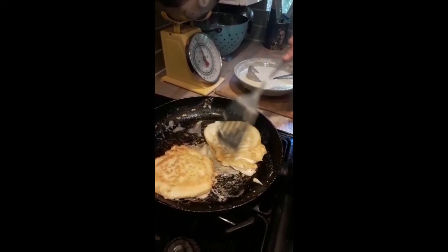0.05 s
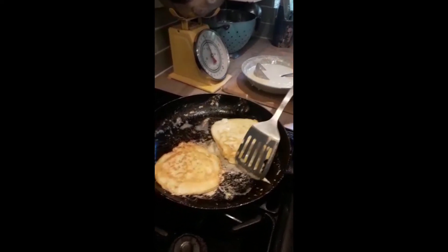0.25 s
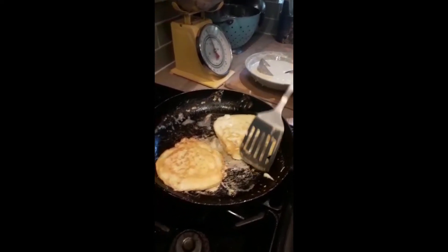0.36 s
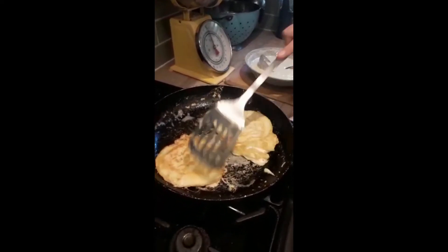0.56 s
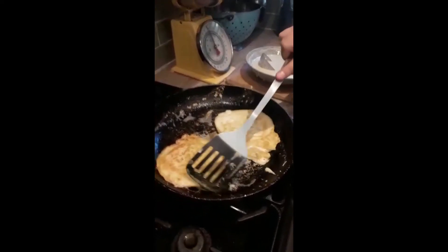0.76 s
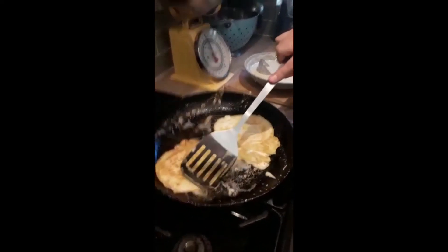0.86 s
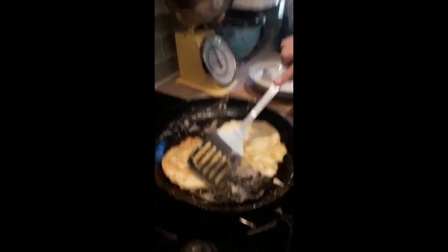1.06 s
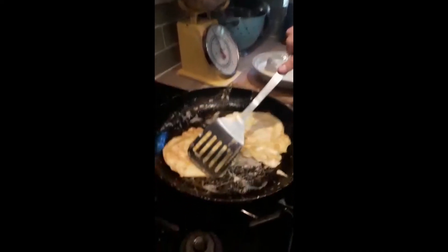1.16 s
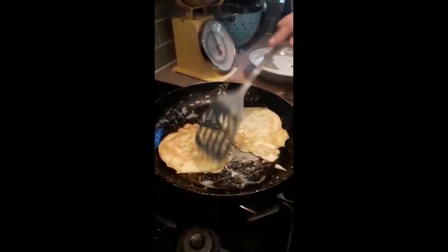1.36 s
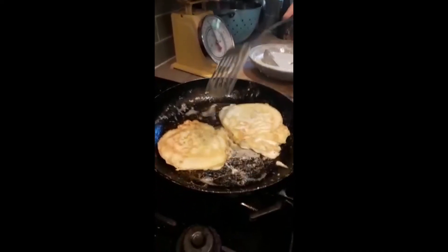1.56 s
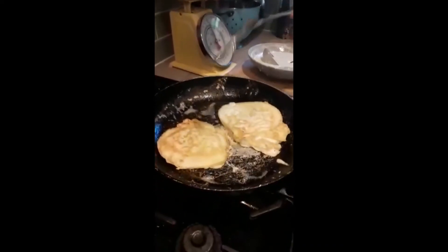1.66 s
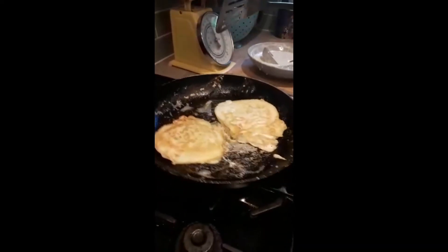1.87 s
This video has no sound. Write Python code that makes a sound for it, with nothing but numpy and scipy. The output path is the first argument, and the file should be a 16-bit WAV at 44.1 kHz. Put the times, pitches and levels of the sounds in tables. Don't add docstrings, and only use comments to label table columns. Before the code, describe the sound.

A steel spatula strikes a frying pan: a bright, rapid chatter on the rim at 0.22-0.27 seconds, then a loud, choked slap at 0.71 with bounces until 0.83 and a faint touch near 0.97. Quiet sizzling and low flame flutter run beneath. Fat spits and light ticks gather from 1.4, with a faint dish scrape after 1.79. Close, short kitchen reverberation.

```python
import sys
import numpy as np
from scipy import signal
from scipy.fft import rfft, irfft
from scipy.io import wavfile
from scipy.ndimage import uniform_filter1d

SR = 44100
rng = np.random.default_rng(int(sys.argv[2]) if len(sys.argv) > 2 else 0)


def store_pcm(level_fs):
    pcm = np.round(np.clip(level_fs, -1, 1) * 32767).astype(np.int16)
    wavfile.write(sys.argv[1], SR, np.atleast_2d(pcm).T)


def gain_from_decibels(decibels):
    exponent = np.asarray(decibels, float) / 20
    return 10 ** exponent


N = 83790

# t/s, level/dB
FLAME_LEVEL = [(0.0, -57), (0.274, -55), (0.47, -63.5), (0.74, -65), (0.878, -55), (.97, -62), (1.06, -61),
               (1.184, -63.5), (1.376, -65), (1.5, -60.5), (1.6, -61), (1.68, -59.5), (1.76, -60),
               (1.9, -55.5)]
# f/Hz, density/dB per Hz
FLAME_SPECTRUM = [(15, -57.5), (25, -32), (124, -3), (204, -6), (356, -4.5), (462, -14.5), (499, -11),
                  (1000, -10), (1300, -37), (2200, -120)]
# t/s, level/dB, fizz over sizzle/dB
FRY_LEVEL = [(0.0, -50.5, 6.5), (0.296, -48.5, 4), (0.438, -53.5, 5.5), (0.56, -56, 4), (0.942, -55, 5),
             (1.152, -57.5, 7), (1.444, -57, 4), (1.608, -52.5, 3.5), (1.9, -52.5, 6)]
# f/Hz, density/dB per Hz
SIZZLE_SPECTRUM = [(530, -90), (900, -16.5), (1230, -12), (1750, -7.5), (2320, -3), (3140, -10),
                   (3230, -9.5), (5000, -14), (6500, -36), (11000, -120)]
# f/Hz, density/dB per Hz
FIZZ_SPECTRUM = [(2940, -39.5), (5000, -22.5), (6030, -0.5), (6480, -3.5), (7310, -5), (8870, -12),
                 (11500, -2.5), (15800, -9)]
# f/Hz, width/Hz, level/dB
PAN_HUM_BANDS = [(2260, 350, -14.5), (5495, 500, -10.5), (12000, 900, -14.5)]
# t/s, level/dB
WHISTLE_LEVEL = [(0, -76), (.5, -91), (1.2, -78), (1.36, -67.5), (1.6, -67), (1.75, -72), (1.82, -63.5),
                 (1.9, -69)]
# t/s, peak level/dB, low cut f/Hz
FAT_SPITS = [(0.338, -33, 9000), (0.371, -41, 9000), (.411, -41, 9000), (0.7757, -43, 9000),
             (0.929, -54, 3000), (1.396, -39, 4930), (1.4491, -40.5, 10000), (1.457, -42, 3530),
             (1.503, -36.5, 10000), (1.5942, -44, 9000), (1.666, -34, 9050), (1.705, -38.5, 9000),
             (1.84, -44, 5000)]
# t/s, peak level/dB, f/Hz
BLADE_TICKS = [(1.3947, -48, 2250), (1.4591, -44, 2230), (1.503, -42, 2194), (1.5145, -36.5, 2310),
               (1.5534, -46, 2190), (1.5752, -50, 2410), (1.6824, -49, 2270), (1.7853, -46, 2230),
               (1.572, -47, 1074), (1.808, -43, 1500), (1.812, -41, 1090), (1.836, -45, 1120),
               (1.861, -41, 240), (1.88, -43, 200)]
# t/s, level/dB
SCRAPE_LEVEL = [(1.74, -94.5), (1.79, -59), (1.805, -46.5), (1.826, -55.5), (1.835, -46.5), (1.86, -46),
                (1.875, -50), (1.9, -48.5)]
# f/Hz, width/Hz, level/dB
DISH_BANDS = [(146.3, 57, -5.5), (296, 91, -11), (750, 300, -6), (1114, 120, -1), (1500, 170, -1.5),
              (1870, 200, -6.5), (2310, 250, 0), (2774, 120, -5.5), (3700, 960, -6), (5500, 1400, -8)]
# t/s, level/dB, free ring before choke/s, tilt/dB per octave, contact rise/s
SLAP_BLOWS = [
    (.7102, -14, 0.0049, 2, 0.00023),
    (0.7137, -12.5, 0.01237, -3.5, 0.0026),
    (.742, -32.5, 0.011, -7, .005),
    (.766, -24.5, 0.0094, -4.5, 0.0053),
    (.777, -22, 0.007, -3.5, 0.0027),
    (.80, -25.5, 0.0134, -0.5, 0.0048),
    (.822, -28, 0.016, 1.5, 0.0041),
    (.972, -42, 0.023, 2, 0.0035),
]
# f/Hz, level/dB, t60/s
PAN_RING = [(111.5, -33, 0.13), (250.4, -25, 0.49), (584, -9, 0.13), (726.7, -3, 0.18), (835, -8, 0.27),
            (1067.5, -4.5, 0.13), (1342, -11.5, .06), (1574, -8.5, 0.09), (1826, -13, 0.038),
            (2030, -14, .04), (2270, -1, 0.089), (2650, -6.5, 0.049)]
# f/Hz, density/dB per Hz
SLAP_SPECTRUM = [(180, -51), (350, -14.5), (674, -8), (1810, -8), (2690, -9), (3810, -31.5), (5390, -32.5),
                 (6360, -35.5), (15500, -57.5)]
# f/Hz, level/dB, t60/s
BLADE_RING = [(3374, -2, 0.058), (4300, -0.5, 0.054), (5370, -2, 0.099), (6800, -16, 0.037),
              (7830, -3.5, 0.036), (9300, -14, .05)]
# f/Hz, density/dB per Hz
BLADE_SPECTRUM = [(3000, -2.5), (5000, -8.5), (8000, -12), (11500, -18.5), (13000, -20.5), (15800, -34.5)]
# t/s, level/dB
RIM_HITS = [
    (0.2245, -12),
    (0.2273, -15.5),
    (.234, -14.5),
    (0.241, -14),
    (0.248, -16.5),
    (.258, -20.5),
    (0.268, -23.5),
]
# f/Hz, level/dB, t60/s
RIM_RING = [(147, -24, 0.09), (579, -14, 0.05), (826, -7.5, 0.044), (975, -7, 0.04), (1118, -6, 0.09),
            (1598, -4.5, .06), (1756, -3.5, .1), (2190, -5.5, 0.073), (2435, -9, 0.037), (2644, 0.5, 0.089),
            (2888, 1.5, .09), (3900, -11, 0.053), (4490, -6, .04), (6280, -4.5, .025)]
# f/Hz, density/dB per Hz
RIM_SPECTRUM = [(280, -13.5), (1300, -12), (2950, -1.5), (3300, -15.5), (7300, -16.5), (8000, -29.5),
                (10500, -21.5), (15500, -41.5)]
# f/Hz, t60/s
KITCHEN_T60 = [(125, 0.64), (500, 0.21), (1500, 0.36), (3000, 0.22), (6000, 0.32), (12000, 0.12)]


def gain_of(table, col=1):
    a = np.array(table, float)
    return gain_from_decibels(np.interp(np.arange(N) / SR, a[:, 0], a[:, col]))


def unit(x):
    return x / np.sqrt(np.mean(x ** 2))


def decay(t, t60_s):
    return np.exp(-np.log(1000) * t / t60_s)


def colour(x, points):
    a = np.array(points, float)
    hz = np.fft.rfftfreq(len(x), 1 / SR) + 1
    gain = gain_from_decibels(np.interp(np.log(hz), np.log(a[:, 0]), a[:, 1]))
    low_edge = np.minimum(1, hz / a[0, 0]) ** 4
    high_edge = np.minimum(1, a[-1, 0] / hz) ** 4
    return irfft(rfft(x) * gain * low_edge * high_edge, len(x))


def band(x, hz, width_hz):
    return signal.lfilter(*signal.iirpeak(min(hz, 0.45 * SR), hz / width_hz, fs=SR), x)


def walk(rate_hz):
    k = int(SR / rate_hz)
    steps = np.repeat(rng.standard_normal(N // k + 1), k)
    return unit(uniform_filter1d(uniform_filter1d(steps, k), k)[:N])


def clicks(rate_hz, scatter_db):
    u = rng.random((3, N))
    size = gain_from_decibels(-scatter_db * np.log(u[2] + 1e-4))
    return unit((u[0] < rate_hz / SR) * np.sign(u[1] - 0.5) * size)


def add(out, at_s, x):
    i = int(at_s * SR)
    out[i:i + len(x)] += x[:N - i]


def blow(modes, crack, crack_db, crack_s, rise_s, split, tilt_db=0):
    t = np.arange(SR // 2) / SR
    tilt_hz = 1420
    hz, db, t60_s = np.repeat(np.array(modes, float), 3, axis=0).T
    c = rng.standard_normal((len(hz), 3))
    spread = c[:, 2] - c[:, 2].reshape(-1, 3).mean(axis=1).repeat(3)
    signs = np.sign(c[::3, 1]).repeat(3)
    gains = signs * gain_from_decibels(db + tilt_db * np.log2(hz / tilt_hz) + 2 * c[:, 0])
    partner_hz = hz * (1 + split * spread)
    ring = gains @ (np.sin(2 * np.pi * partner_hz[:, None] * t) * decay(t, t60_s[:, None]))
    tilted = [(f, d + tilt_db * np.log2(f / tilt_hz)) for f, d in crack]
    noise = unit(colour(rng.standard_normal(len(t)), tilted))
    rise = 1 - np.exp(-(t / rise_s) ** 2)
    return (ring / 3 + gain_from_decibels(crack_db) * noise * np.exp(-t / crack_s)) * rise


def room(x):
    t = np.arange(int(0.7 * SR)) / SR
    a = np.array(KITCHEN_T60)
    tail = 0
    for hz in 90 * 2 ** np.arange(0, 7.6, 0.5):
        t60_s = np.interp(np.log(hz), np.log(a[:, 0]), a[:, 1])
        tail = tail + band(rng.standard_normal(len(t)), hz, hz / 2.5) * decay(t, t60_s)
    rise_s = 0.01
    tail = tail * (1 - np.exp(-t / rise_s))
    return signal.fftconvolve(x, tail / np.sqrt(np.sum(tail ** 2)))[:N]


def flame():
    rumble = unit(colour(rng.standard_normal(N), FLAME_SPECTRUM))
    return gain_of(FLAME_LEVEL) * rumble * gain_from_decibels(1.1 * walk(12))


def bubbling():
    bubbles_per_s, scatter_db, bubble_db = 720, 2, -7.5
    return rng.standard_normal(N) + gain_from_decibels(bubble_db) * clicks(bubbles_per_s, scatter_db)


def frying():
    sizzle = unit(colour(bubbling(), SIZZLE_SPECTRUM)) * gain_from_decibels(walk(25.4))
    fizz = unit(colour(bubbling(), FIZZ_SPECTRUM)) * gain_from_decibels(-9.5 + 0.73 * walk(15))
    hum = 0
    for hz, width_hz, db in PAN_HUM_BANDS:
        tone = unit(band(band(bubbling(), hz, width_hz), hz, width_hz))
        hum = hum + gain_from_decibels(db + 2 * walk(31)) * tone
    return gain_of(FRY_LEVEL) * (sizzle + hum + gain_of(FRY_LEVEL, col=2) * fizz)


def whistle():
    hz, width_hz = 12650, 220
    steam = band(band(rng.standard_normal(N), hz, width_hz), hz, width_hz)
    return gain_of(WHISTLE_LEVEL) * unit(steam) * gain_from_decibels(2.5 * walk(25))


def spits():
    out, t = np.zeros(N), np.arange(SR // 10) / SR
    peak_s, trim_db = 0.00285, -7
    for s, db, low_cut_hz in FAT_SPITS:
        high_pass = signal.butter(2, low_cut_hz, "high", fs=SR)
        puff = signal.lfilter(*high_pass, rng.standard_normal(len(t)))
        add(out, s, gain_from_decibels(db + trim_db) * puff * t / peak_s * np.exp(1 - t / peak_s))
    return out


def ticks():
    out, t = np.zeros(N), np.arange(SR // 10) / SR
    rise_s, t60_s = 0.00082, 0.026
    for s, db, hz in BLADE_TICKS:
        add(out, s, gain_from_decibels(db) * np.sin(2 * np.pi * hz * t) * np.minimum(t / rise_s, 1) * decay(t, t60_s))
    return out


def scrape():
    slips = clicks(1100, 0.99)
    dish = 0
    for hz, width_hz, db in DISH_BANDS:
        dish = dish + gain_from_decibels(db) * unit(band(band(slips, hz, width_hz), hz, 2 * width_hz))
    return gain_of(SCRAPE_LEVEL) * unit(dish)


def slaps():
    out, t = np.zeros(N), np.arange(SR // 2) / SR
    choke_db, choke_s = -21, 0.0022
    for s, db, held_s, tilt_db, rise_s in SLAP_BLOWS:
        choke = gain_from_decibels(choke_db * np.clip((t - held_s) / choke_s, 0, 1) ** 2)
        hit = blow(PAN_RING, SLAP_SPECTRUM, crack_db=-1.5, crack_s=0.0052, rise_s=rise_s,
                   split=0.013, tilt_db=tilt_db)
        add(out, s, gain_from_decibels(db) * choke * hit)
    blade = blow(BLADE_RING, BLADE_SPECTRUM, crack_db=-6, crack_s=0.01, rise_s=0.0012, split=0.024)
    add(out, 0.7108, gain_from_decibels(-28.5) * blade)
    return out


def rim():
    out = np.zeros(N)
    for s, db in RIM_HITS:
        hit = blow(RIM_RING, RIM_SPECTRUM, crack_db=-5.5, crack_s=0.017, rise_s=0.00031, split=0.016)
        add(out, s, gain_from_decibels(db) * hit)
    return out


def scene():
    rim_hits, pan_slaps = rim(), slaps()
    small = spits() + ticks() + scrape()
    wet = room(gain_from_decibels(-5.5) * rim_hits + gain_from_decibels(-9) * pan_slaps + gain_from_decibels(-3) * small)
    low_cut = signal.butter(4, 138, "high", fs=SR, output="sos")
    contacts = signal.sosfilt(low_cut, rim_hits + pan_slaps + small + wet)
    return (contacts + frying() + whistle() + flame())[None]


def band_limit(x):
    return signal.sosfilt(signal.butter(12, 16870, fs=SR, output="sos"), x)


def record(dry):
    top_cut = signal.ellip(8, 0.2, 40, 16000, fs=SR, output="sos")
    mix = signal.sosfilt(top_cut, dry)
    return band_limit(mix)


dry = scene()
out = record(dry)
store_pcm(out)
```